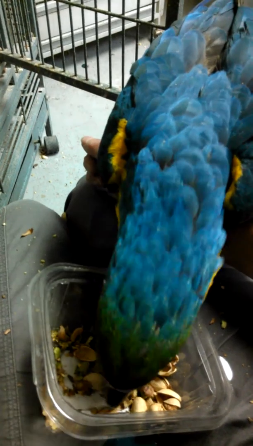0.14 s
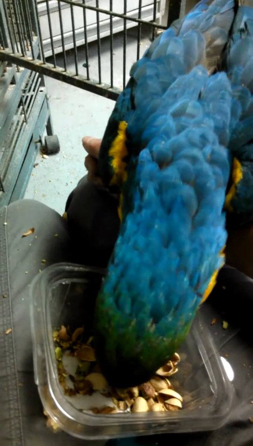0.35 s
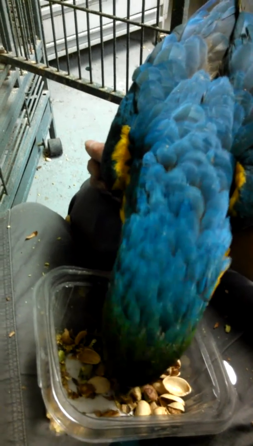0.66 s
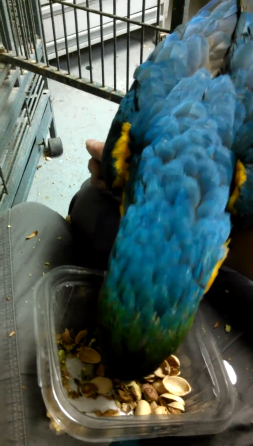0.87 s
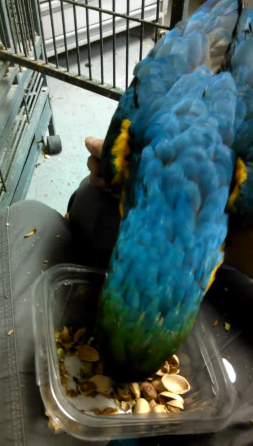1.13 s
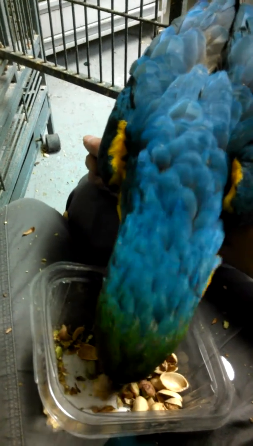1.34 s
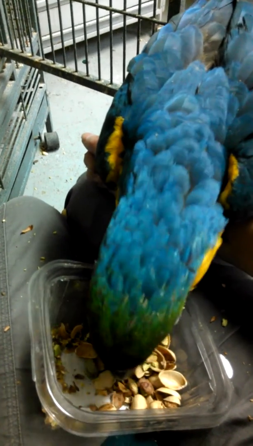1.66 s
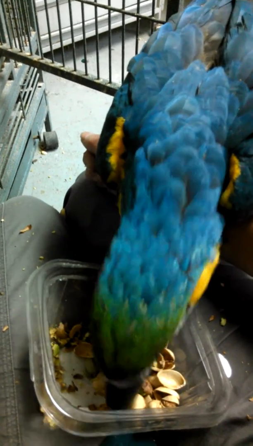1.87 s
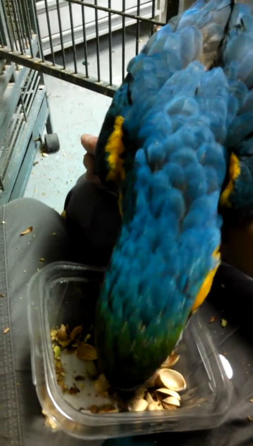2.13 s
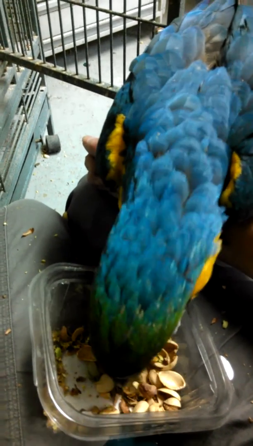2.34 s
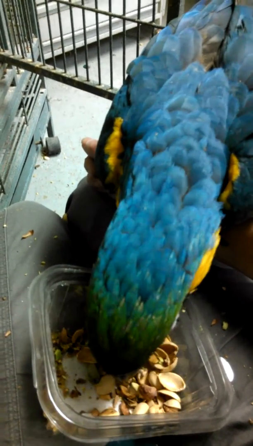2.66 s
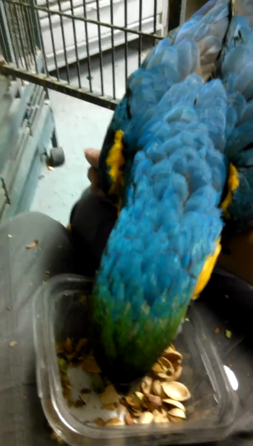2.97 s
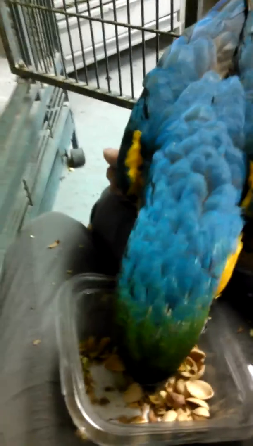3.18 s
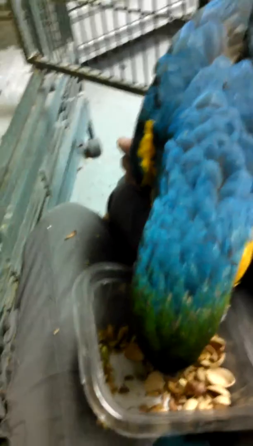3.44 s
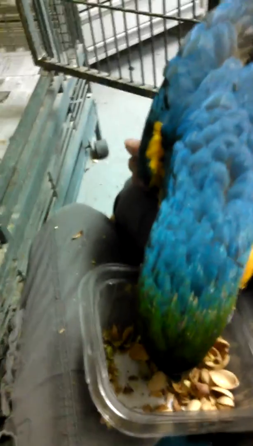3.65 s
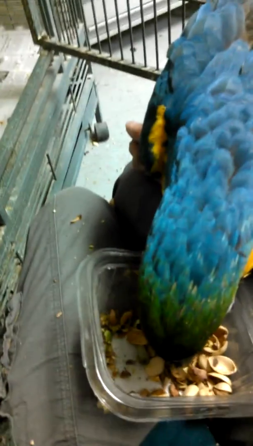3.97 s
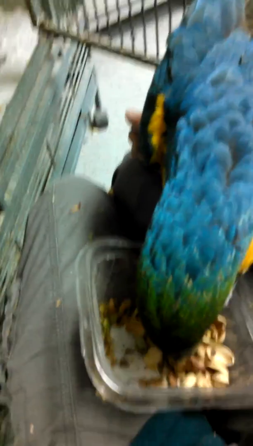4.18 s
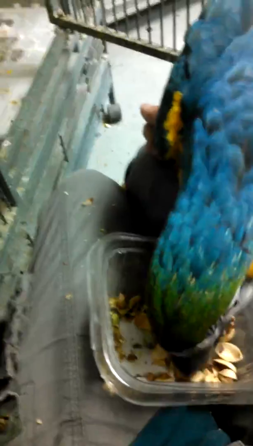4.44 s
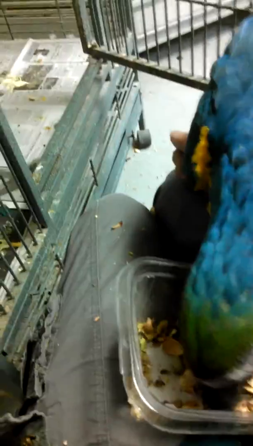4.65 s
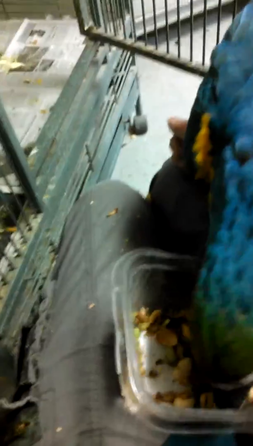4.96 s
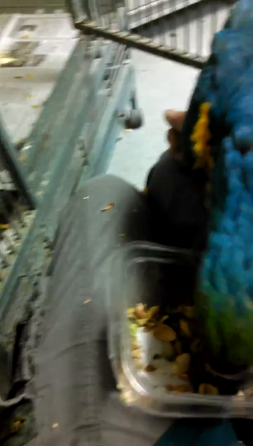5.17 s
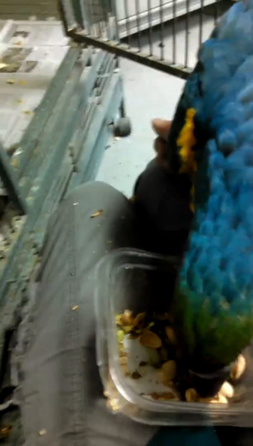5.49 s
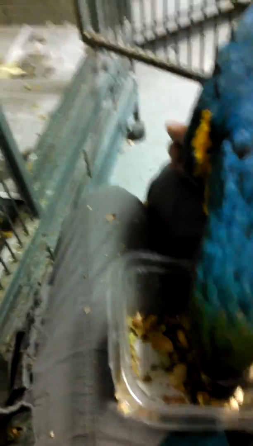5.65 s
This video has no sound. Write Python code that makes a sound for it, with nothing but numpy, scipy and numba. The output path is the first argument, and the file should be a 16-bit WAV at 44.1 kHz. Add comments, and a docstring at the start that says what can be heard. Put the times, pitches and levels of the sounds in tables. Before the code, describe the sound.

An indoor bird room with hard walls that ring briefly after every call, over a very faint steady hush. A breathy rasp opens, and short shrieks at about 0.3 and 0.6 s crack into high hoarse rasps. A rough growl rises at 0.8 s, a clear whistle starts near 1.05 s and a sharp screech at 1.15 s. A large parrot squawks long and harsh from 1.4 to 2.1 s, with a husky whistle alongside, then longer and rougher from 2.3 to 3.2 s, loud enough to overload the phone microphone. Small low croaks sit between. Shrieks at 3.2 and 3.5 s break into rasps. At 3.75 s a brighter squawk swoops up, breaks and turns gritty until 4.4 s. Screeches follow at 4.4 s, a low coo at 4.6 s, a rising yelp and thin whistle near 4.9 s, then a quiet drawn-out croak from 5.1 s and faint far squawks at 5.4 and 5.65 s.

```python
"""An indoor bird room whose hard walls ring after every call, over a faint steady hush of filtered noise.
A rasp opens, then shrieks break into high rasps and a growl, whistle and screeches follow. A large parrot gives
two long harsh squawks among croaks; after more shrieks a brighter squawk swoops up. Screeches, a coo, a whistle,
a yelp, a drawn-out croak and far squawks close. Voices are syrinx pulses and breath noise filtered by a throat;
the harsh squawks overload a phone's one microphone, which a short filtered echo spreads over two channels."""
import sys
import numpy as np
from scipy import signal
from scipy.fft import rfft, irfft, next_fast_len
from scipy.io import wavfile
from scipy.ndimage import uniform_filter1d, minimum_filter1d
from numba import njit

SR = 44100
rng = np.random.default_rng(int(sys.argv[2]) if len(sys.argv) > 2 else 0)


def unload_audio(sound):
    """Save the sound as a 16-bit wav file, at the path given as the first command line argument."""
    columns = np.transpose(np.atleast_2d(sound))
    # keep every value between -1 and 1, then stretch to whole-number steps
    steps = np.round(np.clip(columns, -1, 1) * 32767)
    wavfile.write(sys.argv[1], SR, steps.astype(np.int16))


N = 256662

# Levels of calls are those before the walls and the final mix.
# Sung calls: (start [s], time from start to turning pitch [s], length [s], reference level [dB],
# first pitch [Hz], turning pitch [Hz], last pitch [Hz])
SQUAWKS = [(1.39, .35, 0.69, -12.5, 864.3, 908.5, 973.4), (2.305, .45, .89, -12, 883.5, 946, 885.5)]
SHRIEKS = [(.273, 0.055, 0.17, -22.5, 990, 1080, 1045), (.568, 0.0468, 0.15, -24, 1000, 1070, 1040),
           (3.23, 0.0904, 0.18, -20, 1040, 1122, 1046), (3.52, 0.059, 0.13, -19, 1040, 1094, 1004)]
SCREECHES = [(1.13, 0.076, 0.15, -13.5, 1790, 1920, 1500), (4.42, 0.083, 0.2, -16.5, 1650, 1980, 1600),
             (1.16, 0.053, 0.11, -23, 1900, 2280, 2200), (4.44, 0.0445, 0.13, -19, 2120, 2260, 2000)]
COOS = [(4.57, .3, 0.52, -21, 639.3, 614, 605)]
YELPS = [(4.86, .185, 0.29, -22, 1080, 1560, 1390)]
FAR_SQUAWKS = [(5.38, 0.08, 0.295, -31, 1017, 1030, 1036), (5.65, 0.083, 0.157, -28.5, 959, 1001, 963)]
HUSKY_WHISTLES = [(1.43, 0.306, 0.58, -19, 1482, 1458, 1453), (3.315, 0.06, 0.14, -23, 1140, 1173, 1164)]
GROWLS = [(.78, 0.12, .32, -25, 481.4, 802, 743.6)]
# Traced calls, one list a call: (time [s], pitch [Hz], level [dB], roughness [clipped to 0-1],
# beak resonance [Hz], treble gain [dB])
WHISTLES = [
    [(1.05, 1530, -27, .05, 1500, -15), (1.09, 1517, -25, 0.11, 1500, -11),
     (1.115, 1524, -14.5, 0.06, 1520, -6), (1.14, 1515, -22, 0.09, 1500, -4),
     (1.18, 1500, -28, 0, 1500, -7.5), (1.25, 1512, -25, 0.02, 1500, -13.5),
     (1.33, 1520, -30, 0.07, 1490, -19)],
    [(4.85, 1421, -40, 0, 1400, -12), (4.93, 1422, -25, 0, 1400, -21), (5.02, 1391, -30.5, 0.13, 1410, 1.5),
     (5.11, 1357, -41, 0.2, 1400, -10)],
]  # clear, with an overtone that flares and fades
SWOOPS = [
    [(3.75, 494, -41, 0.8, 1010, -4), (3.77, 478.3, -18, 0.55, 1380, -13),
     (3.787, 446.6, -13, 0.45, 1400, 5), (3.8, 488, -12, 0.04, 995, -10),
     (3.825, 566.8, -16, 0.22, 1120, 0.5), (3.848, 687.4, -17.5, 0.23, 1400, 14.5),
     (3.865, 807, -8.5, 0.18, 1650, -0.5), (3.91, 860.7, -11.5, 0.29, 1770, 8),
     (3.945, 914.3, -16, 0.22, 1770, 11), (3.975, 937.4, -13, 0.3, 2800, 3),
     (4.02, 977.5, -10.5, 0.39, 2000, 5), (4.13, 1014, -12, 0.74, 2120, 3.5),
     (4.25, 1010, -10.5, 0.68, 2060, 2.5), (4.28, 912, -12.5, 0.66, 1920, 6),
     (4.38, 904.5, -10.5, 0.82, 1930, 1.5), (4.41, 887.6, -20, 1.34, 1829, -17)],
    [(3.945, 598, -16, 0.36, 1630, -17), (3.965, 515, -16.5, 0.4, 1540, -22),
     (3.99, 461, -8, 0.8, 1430, -2), (4.01, 387, -26, 0.43, 1270, 19)],
]  # a squawk that swoops up as the beak opens, breaks once and turns harsh
# Hoarse bursts: (start [s], time from start to peak [s], length [s], peak level [dB], fall by the end [dB],
# first beak resonance [Hz], last beak resonance [Hz])
RASPS = [(-.08, 0.16, 0.36, -23.5, 56, 1860, 1750), (.46, 0.088, 0.16, -24, 2.8, 1810, 1600)]
BREAKS = [(.405, 0.017, 0.064, -19.5, 12, 4040, 2980), (.68, 0.0093, 0.11, -24, 15, 4100, 3100),
          (3.37, 0.02, 0.18, -23.5, 8.6, 3660, 2870), (3.625, 0.017, 0.19, -25, 10.5, 3850, 3450)]  # high rasps into which shrieks break
CROAKS = [(.335, 0.016, 0.067, -40, 12, 1630, 950), (.5, 0.071, 0.13, -40.5, 31, 1210, 895),
          (1.29, 0.33, 0.21, -25.5, 1.4, 1340, 1250), (2.18, 0.056, 0.14, -31, 14, 1280, 1360),
          (2.92, 0.056, 0.11, -27.5, 15, 525, 503), (1.98, 0.029, 0.046, -26.5, 8.2, 607, 500),
          (3.43, 0.062, 0.1, -36.5, 12, 730, 680), (3.68, 0.096, .095, -28.5, 2.7, 774, 880)]
# One drawn-out croak: (time [s], level [dB], beak resonance [Hz])
LONG_CROAK = [(5.09, -46, 1480), (5.149, -38, 1400), (5.181, -28.5, 810), (5.3, -30.5, 680),
              (5.45, -31, 950), (5.65, -33, 900), (5.71, -71, 900)]

# Throat and beak response of each caller: (frequency [Hz], gain [dB])
SQUAWK_THROAT = [(150, -40), (250, -61.5), (581, -9), (893, -10.5), (1350, -7.5), (1850, -2), (2080, -3),
                 (2300, -1.5), (2490, -13), (2940, -7.5), (3500, -8), (4020, -12.5), (5590, -28),
                 (6600, -34), (8320, -53), (12000, -49), (13000, -80)]
SWOOP_THROAT = [(150, -59), (300, -24), (460, -7), (652, 1.5), (986, -0.5), (1180, -4.5), (1760, -2.5),
                (2070, -8.5), (2370, -4), (4020, 2.5), (6490, -30), (10700, -30.5), (13000, -43.5)]
SHRIEK_THROAT = [(530, -57), (900, -32), (1200, -23), (1730, 4), (2170, -1.5), (2690, -16), (3300, 8),
                 (3670, -17), (4390, 7.5), (4710, -10.5), (6500, -8), (7060, -25), (7500, -16.5),
                 (15500, -32)]
WHISTLE_THROAT = [(1000, -12), (1480, 2), (3000, 7), (4500, -24.5), (6000, -39), (9000, -72.5)]
HUSKY_THROAT = [(1000, -24.5), (1200, -6), (1480, 8), (2330, 0), (3000, -4), (4500, -18), (6000, -35.5),
                (9000, -58)]
SCREECH_THROAT = [(650, -92.5), (1100, -10.5), (1500, -10.5), (3080, -10.5), (3300, 6), (3740, 4.5),
                  (4580, -7), (5140, -18.5), (9710, -29), (11000, -40.5), (14300, -101), (22000, -120)]
YELP_THROAT = [(900, -22), (1500, -21), (2300, 3.5), (3000, -7), (3600, -15), (4800, -31), (7000, -55)]
COO_THROAT = [(290, -72), (500, -36), (700, -21.5), (928, -14), (1080, -19), (1260, -3.5), (1650, 0),
              (1880, -11.5), (2170, -7), (2510, -7), (2800, -14), (3200, -1.5), (4310, -44.5), (5030, -15),
              (7000, -66.5), (9100, -99.5), (15400, -120)]
RASP_THROAT = [(180, -70), (300, -31.5), (650, -9.5), (964, -13.5), (1160, -6), (1320, -8), (1650, -10),
               (2050, -5.5), (2500, -7), (3050, 2), (4000, -11.5), (5000, -26), (6300, -17), (7200, -26.5),
               (13000, -35)]
BREAK_THROAT = [(1500, -63), (2700, -16), (3050, -0.5), (4300, -11.5), (5000, -14), (6300, -14),
                (7200, -24.5), (13000, -37.5)]
CROAK_THROAT = [(71, -69.5), (120, -16.5), (237, -13.5), (514, -7.5), (610, -15), (795, -2.5), (1510, -5.5),
                (1860, -22), (2050, -11.5), (2470, -2), (4790, -15), (5470, -29), (11000, -45.5),
                (14300, -101.5), (22000, -120)]
FAR_THROAT = [(500, -5.5), (1000, 0.5), (1500, -10), (2020, 0), (2700, -13), (3500, 11.5), (4100, -13),
              (5000, -62), (9000, -68)]
# Fixed resonances rung by breath whatever the pitch, lying near lines at half the squawk pitch: (frequency
# [Hz], width of each of two passes [Hz], gain [dB])
BREATH_MODES = [(1470, 90, -3), (1830, 300, 2), (2300, 160, -9), (2880, 300, -13), (3290, 160, -8),
                (3800, 300, -10)]
# Spectrum of turbulent breath in harsh calls: (frequency [Hz], gain [dB])
HARSH_BREATH = [(100, -24), (1200, -16), (2200, -8), (3000, 0), (4500, 0), (15000, -6)]
# Low-pass that parts the body of a voice from its treble: (frequency [Hz], gain [dB])
SHUT_BEAK = [(20, 0), (1900, 0), (2500, -40), (22000, -40)]

# Envelopes: attack_s [s] climbs rise_db [dB], the hold loses fade_db [dB], release_s [s] drops fall_db [dB];
# bend [exponent] rounds the pitch at its turn
SQUAWK_SHAPE = dict(attack_s=0.045, rise_db=17, fade_db=1.8, release_s=0.011, fall_db=18.5, bend=1.3)
SHRIEK_SHAPE = dict(attack_s=0.037, rise_db=3.5, fade_db=-1.5, release_s=0.033, fall_db=0, bend=2.6)
SCREECH_SHAPE = dict(attack_s=0.042, rise_db=12, fade_db=3.6, release_s=0.025, fall_db=11, bend=1.6)
YELP_SHAPE = dict(attack_s=0.43, rise_db=11, fade_db=5, release_s=0.05, fall_db=12, bend=1.2)
COO_SHAPE = dict(attack_s=.25, rise_db=11, fade_db=1.5, release_s=.17, fall_db=12, bend=1.1)
FAR_SHAPE = dict(attack_s=.03, rise_db=6, fade_db=.5, release_s=.03, fall_db=8, bend=1.3)
HUSKY_SHAPE = dict(attack_s=.065, rise_db=13, fade_db=4, release_s=.05, fall_db=5, bend=1.1)
GROWL_SHAPE = dict(attack_s=0.074, rise_db=5.5, fade_db=6, release_s=0.044, fall_db=15, bend=0.68)
# Roughness by caller: (at the start [0-1], at the turn [0-1], at the end [0-1])
ROUGH = dict(clear_squawk=(.4, .46, .72), squawk=(.4, .76, .72), husky=(.3, .3, .35),
         shriek=(.25, .12, .25), hoarse_shriek=(.5, .3, .4), screech=(.4, .55, .45), growl=(.5, .9, 1),
         far=(.7, .6, .7), yelp=(.4, .2, .45), coo=(.35, .06, .2))

# Decay of the walls' echoes: (band centre [Hz], time to fall 60 dB [s])
ROOM_T60 = [(500, 0.46), (2000, 0.6), (5000, 0.15), (12000, 0.0043)]
# Spectrum of the background hush: (frequency [Hz], gain [dB])
HUSH = [(25, -26), (45, -19), (58, -17), (70, -48), (400, -40), (2000, -18), (4000, -28), (9000, -45)]
# Echoes that make the stereo difference: (delay [samples], gain [ratio])
SPREAD_TAPS = [(35, .055), (108, .02), (174, .04), (180, .04)]
# One resonant echo of the same kind: (delay [samples], centre [Hz], width [Hz], gain [ratio])
SPREAD_RING = (71, 1200, 470, 1.)

HUSH_DB = -63
STAGGER_RATE, HALVING_RATE, THROB_RATE = 150, 25, 90  # new random targets a second
BEAK_WIDTH_HZ = 550.
RASP_HZ, CROAK_HZ = 514.3, 263.8
RASP_RISE_DB, CROAK_RISE_DB, BURST_BEND = 18, 13.5, 2.6
HOARSE_ROUGH = .9  # roughness, 0-1
# level sent to the walls
SQUAWK_WET_DB, SWOOP_WET_DB, CLEAR_WET_DB = -4.5, -10, -3.5
CROAK_WET_DB, RASP_WET_DB, BREAK_WET_DB = 0.5, -27, -8
TOP_HZ = 15500  # top of the harmonics and of the recorded band
LIMIT_TOP, LIMIT_SAMPLES = .83, 19


def undb(db):
    """Level to amplitude: 20 dB is a factor of ten."""
    return 10 ** (np.asarray(db) / 20)


def unit(x):
    """Normalisation of power: the signal scaled to rms 1."""
    return x / np.sqrt(np.mean(x ** 2))


def colour(x, points):
    """Linear filtering: a spectrum multiplied by gains interpolated over log frequency."""
    size = next_fast_len(len(x) + 2048)
    hz, db = np.transpose(points)
    f = np.maximum(np.arange(size // 2 + 1) * SR / size, 1)
    gain = undb(np.interp(np.log(f), np.log(hz), db, -90, -90))
    return irfft(rfft(x, size) * gain, size)[:len(x)]


def ring(x, hz, width_hz):
    """Resonance: one second-order mode with gain 1 at its centre."""
    return signal.lfilter(*signal.iirpeak(hz, hz / width_hz, SR), x)


def hush():
    """Stationary noise: white noise shaped by a fixed spectrum."""
    return undb(HUSH_DB) * unit(colour(rng.standard_normal(N), HUSH))


def room(x):
    """Reverberation: dense echoes of hard walls as decaying noise that dies faster in the treble."""
    t = np.arange(int(.7 * SR)) / SR
    tail = np.zeros(len(t))
    for hz, t60 in ROOM_T60:
        band = unit(ring(rng.standard_normal(len(t)), hz, hz))
        tail += band * np.sqrt(hz) * 1000 ** (-t / t60)
    tail *= np.clip(t / 0.0037, 0, 1)
    return signal.fftconvolve(x, tail / np.sqrt(np.sum(tail ** 2)))[:N]


@njit
def beak(x, hz, width_hz):
    """Time-varying resonance: a state-variable band-pass whose centre moves."""
    y, band, low = np.empty(len(x)), 0., 0.
    for i in range(len(x)):
        g, k = np.tan(np.pi * hz[i] / SR), width_hz / hz[i]
        v = (band + g * (x[i] - low)) / (1 + g * (g + k))
        band, low, y[i] = 2 * v - band, low + 2 * g * v, k * v
    return y


def syrinx_cycles(hz, rough, chance, jitter, wander, shimmer_db, halving, throb_db):
    """Irregular oscillation: phase in turns and pulse strength, perturbed in proportion to roughness."""
    t = np.arange(len(hz)) / SR

    def drift(rate, column):
        return np.interp(t * rate, np.arange(len(chance)), chance[:, column])

    # each cycle has its own length and strength; the pitch also staggers every few ms
    steady = np.cumsum(hz) / SR
    uneven = jitter * chance[steady.astype(int), 0] + wander * drift(STAGGER_RATE, 2)
    turns = np.cumsum(hz * (1 + rough * uneven)) / SR
    strength = undb(shimmer_db * rough * chance[np.round(turns).astype(int), 1])
    # alternate strong and weak pulses, to a drifting degree, put lines at half the pitch
    alternation = np.cos(np.pi * turns) * (1 + .5 * drift(HALVING_RATE, 0))
    strength = strength * (1 + halving * rough * alternation)
    # the throb does not depend on roughness
    return turns, strength * undb(throb_db * drift(THROB_RATE, 1))


def pulse_train(turns, count):
    """Harmonic series: equal cosines summed in closed form to one sharp pulse a cycle."""
    return np.sin((2 * count + 1) * np.pi * turns) / (2 * np.sin(np.pi * turns) + 1e-12) - .5


def breath_modes(puffs):
    """Fixed resonances: breath rings each mode twice over, whatever the pitch."""
    return unit(sum(undb(db) * ring(ring(puffs, hz, width), hz, width) for hz, width, db in BREATH_MODES))


def calls(tables, throat, jitter, wander, shimmer_db, breath_db, modes_db=None, beak_db=0.,
          halving=0., breath=None, throb_db=0.):
    """Source and filter: syrinx pulses with a puff of breath each pass through throat, fixed breath modes and
    beak."""
    out = np.zeros(N)
    for table in tables:
        s, *columns = np.transpose(table)
        i = np.arange(max(int(s[0] * SR), 0), min(int(s[-1] * SR), N))
        hz, db, rough, *beak_columns = (np.interp(i / SR, s, c) for c in columns)
        rough = np.clip(rough, 0, 1)
        chance = np.clip(rng.standard_normal((4096, 3)), -2, 2)
        air = rng.standard_normal(SR)[:len(i)]
        turns, strength = syrinx_cycles(hz, rough, chance, jitter, wander, shimmer_db, halving, throb_db)
        pulses = unit(pulse_train(turns, int(TOP_HZ / hz.max())) * strength)
        puffs = air * strength * (1 + np.cos(2 * np.pi * turns))
        breathing = unit(colour(puffs, breath) if breath else puffs)
        voice = unit(colour(pulses + undb(breath_db) * rough * breathing, throat))
        if modes_db is not None:
            voice = unit(voice + undb(modes_db) * rough * breath_modes(puffs))
        if beak_columns:
            voice = unit(voice + undb(beak_db) * unit(beak(voice, beak_columns[0], BEAK_WIDTH_HZ)))
        if len(beak_columns) > 1:
            low = colour(voice, SHUT_BEAK)
            voice = low + undb(beak_columns[1]) * (voice - low)
        edge = np.clip(np.minimum(i - s[0] * SR, i[-1] - i) / (.012 * SR), 0, 1)  # 12 ms fades
        out[i] += voice * undb(db) * edge
    return out


def sung(rows, rough, attack_s, rise_db, fade_db, release_s, fall_db, bend):
    """Pitch and loudness contours: a glide to a turn and on, under attack, hold and release."""
    tables = []
    for start, turn, length, db, first_hz, turn_hz, last_hz in rows:
        t = np.arange(0, length, .005)
        before = np.clip(1 - t / turn, 0, 1) ** bend
        after = np.clip((t - turn) / (length - turn), 0, 1) ** bend
        hz = turn_hz + (first_hz - turn_hz) * before + (last_hz - turn_hz) * after
        corners = [0, attack_s, length - release_s, length]
        level = db - np.interp(t, corners, [rise_db, 0, fade_db, fade_db + fall_db])
        roughness = np.interp(t, [0, turn, length], rough)
        tables.append(np.transpose([start + t, hz, level, roughness]))
    return tables


def bursts(rows, hz, rise_db):
    """Hoarse contours: one nominal pitch swells to a peak and falls while the beak resonance glides."""
    tables = []
    for start, peak, length, db, fall_db, first_hz, last_hz in rows:
        t = np.arange(0, length, .005)
        swell = rise_db * np.clip(1 - t / peak, 0, 1) ** BURST_BEND
        fall = fall_db * np.clip((t - peak) / (length - peak), 0, 1) ** BURST_BEND
        beak_hz = first_hz + (last_hz - first_hz) * t / length
        same = np.ones(len(t))
        tables.append(np.transpose([start + t, hz * same, db - swell - fall, HOARSE_ROUGH * same, beak_hz]))
    return tables


def far_squawks():
    """Irregular pulses: squawks of uneven pitch through a throat with a peak at 3500 Hz."""
    return calls(sung(FAR_SQUAWKS, ROUGH["far"], **FAR_SHAPE), FAR_THROAT,
                 jitter=.05, wander=.075, shimmer_db=5., breath_db=0.)


def croaks():
    """Low relaxation pulses: rough, low-pitched bursts and one drawn-out croak through a moving beak."""
    drawn_out = [[(s, CROAK_HZ, db, HOARSE_ROUGH, beak_hz) for s, db, beak_hz in LONG_CROAK]]
    return calls(bursts(CROAKS, CROAK_HZ, CROAK_RISE_DB) + drawn_out, CROAK_THROAT,
                 jitter=.1, wander=.12, shimmer_db=3., breath_db=-4., beak_db=-2.)


def rasps():
    """Turbulence: breath noise outweighs the irregular pulses."""
    return calls(bursts(RASPS, RASP_HZ, RASP_RISE_DB), RASP_THROAT,
                 jitter=.1, wander=.1, shimmer_db=1.5, breath_db=11., beak_db=-3.)


def shriek_breaks():
    """Loss of periodicity: shrieks end in breath-heavy rasps with a high beak resonance."""
    return calls(bursts(BREAKS, RASP_HZ, RASP_RISE_DB), BREAK_THROAT,
                 jitter=.1, wander=.1, shimmer_db=2.5, breath_db=8., beak_db=2.)


def growls():
    """Period doubling: alternating pulses under strong breath, with a rising pitch."""
    return calls(sung(GROWLS, ROUGH["growl"], **GROWL_SHAPE), RASP_THROAT, jitter=.08, wander=.08,
                 shimmer_db=3., breath_db=5., halving=.5, breath=HARSH_BREATH)


def coos():
    """Low-pitched phonation: pulses turn nearly regular in mid-call under a slow swell."""
    return calls(sung(COOS, ROUGH["coo"], **COO_SHAPE), COO_THROAT,
                 jitter=.08, wander=.06, shimmer_db=8., breath_db=-4., throb_db=2.)


def yelps():
    """Pitch glide: a tone leaps upward and falls part of the way back."""
    return calls(sung(YELPS, ROUGH["yelp"], **YELP_SHAPE), YELP_THROAT,
                 jitter=.04, wander=.07, shimmer_db=5., breath_db=-5.)


def whistles():
    """Harmonic filtering: clear tones keep few harmonics while the treble gain flares and fades."""
    return calls(WHISTLES, WHISTLE_THROAT,
                 jitter=.05, wander=.05, shimmer_db=4., breath_db=-6., beak_db=-30.)


def husky_whistles():
    """Mixed excitation: nearly level tones carry a little breath and roughness."""
    return calls(sung(HUSKY_WHISTLES, ROUGH["husky"], **HUSKY_SHAPE), HUSKY_THROAT,
                 jitter=.05, wander=.05, shimmer_db=4., breath_db=-6.)


def screeches():
    """High-pitched phonation: rough pulses arch in pitch through a throat bright near 3500 Hz."""
    return calls(sung(SCREECHES, ROUGH["screech"], **SCREECH_SHAPE), SCREECH_THROAT,
                 jitter=.04, wander=.055, shimmer_db=6., breath_db=-9.)


def shrieks():
    """Amplitude modulation: throbbing pulses arch in pitch, the third call hoarser than the others."""
    clear = sung(SHRIEKS[:2] + SHRIEKS[3:], ROUGH["shriek"], **SHRIEK_SHAPE)
    hoarse = sung(SHRIEKS[2:3], ROUGH["hoarse_shriek"], **SHRIEK_SHAPE)
    return calls(clear + hoarse, SHRIEK_THROAT,
                 jitter=.04, wander=.05, shimmer_db=5., breath_db=-12., throb_db=3.)


def swoops():
    """Moving formant: the beak resonance shifts along a pitch that swoops up, breaks and turns harsh."""
    return calls(SWOOPS, SWOOP_THROAT, jitter=.06, wander=.065, shimmer_db=5., breath_db=-2.,
                 modes_db=-7., beak_db=3., halving=.7, throb_db=1., breath=HARSH_BREATH)


def squawks():
    """Period doubling with turbulence: long harsh pulses whose breath rings fixed modes."""
    clear = sung(SQUAWKS[:1], ROUGH["clear_squawk"], **SQUAWK_SHAPE)
    harsh = sung(SQUAWKS[1:], ROUGH["squawk"], **SQUAWK_SHAPE)
    return calls(clear + harsh, SQUAWK_THROAT, jitter=.06, wander=.072, shimmer_db=5., breath_db=0.,
                 modes_db=-4., halving=.6, throb_db=.8, breath=HARSH_BREATH)


def scene():
    """Superposition: all callers at the one microphone, direct and by way of the walls."""
    clear = (far_squawks() + growls() + coos() + yelps() + whistles() + husky_whistles()
             + screeches() + shrieks())
    groups = [(croaks(), CROAK_WET_DB), (rasps(), RASP_WET_DB), (shriek_breaks(), BREAK_WET_DB),
              (clear, CLEAR_WET_DB), (swoops(), SWOOP_WET_DB), (squawks(), SQUAWK_WET_DB)]
    direct = sum(group for group, _ in groups)
    echoes = room(sum(undb(wet_db) * group for group, wet_db in groups))
    return np.tile(undb(-0.5) * direct + echoes + hush(), (2, 1))


def record(dry):
    """Sum and difference: late copies add left and subtract right; a quick limiter and a low-pass follow."""
    mid = dry[0]

    def late(lag):
        return np.concatenate([np.zeros(lag), mid[:-lag]])

    lag, hz, width_hz, ring_gain = SPREAD_RING
    side = ring_gain * ring(late(lag), hz, width_hz)
    side = side + sum(gain * late(k) for k, gain in SPREAD_TAPS)
    wide = np.array([mid + side, mid - side])
    # the overload flattens each channel's peaks
    headroom = LIMIT_TOP / np.maximum(np.abs(wide), LIMIT_TOP)
    limit = uniform_filter1d(minimum_filter1d(headroom, size=LIMIT_SAMPLES), size=LIMIT_SAMPLES)
    band_edge = signal.ellip(10, .2, 80, TOP_HZ, fs=SR, output="sos")
    return signal.sosfilt(band_edge, wide * limit)


dry = scene()
out = record(dry)
unload_audio(out)
```